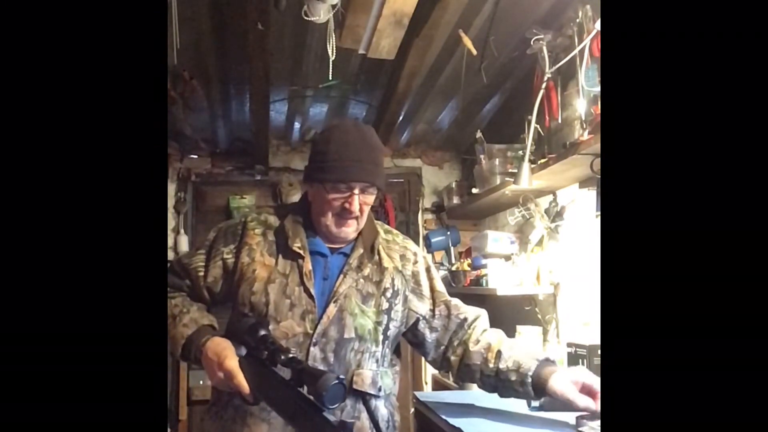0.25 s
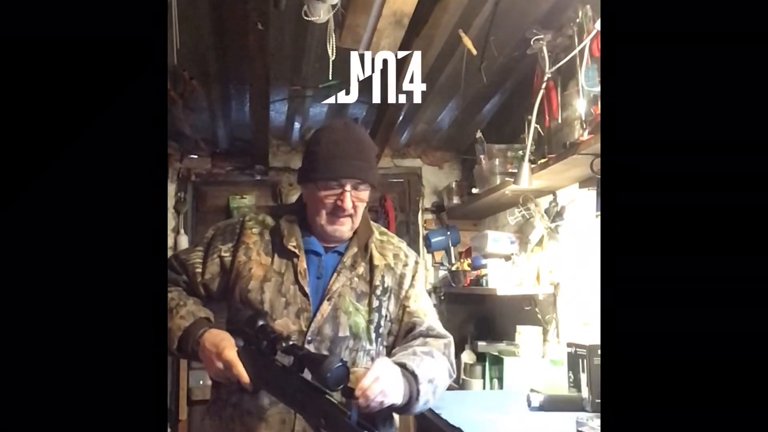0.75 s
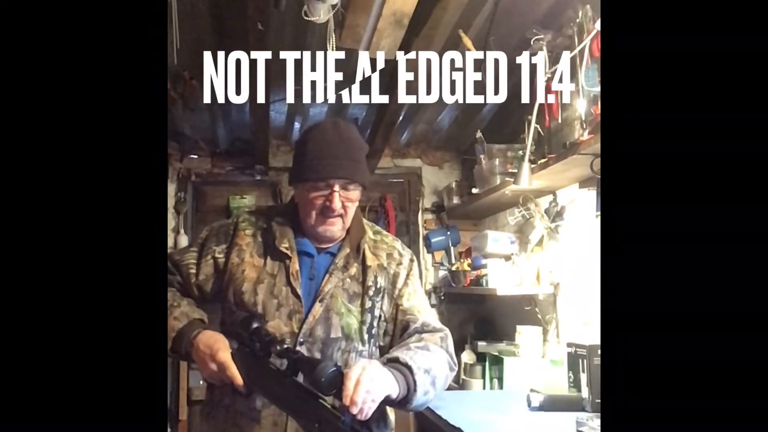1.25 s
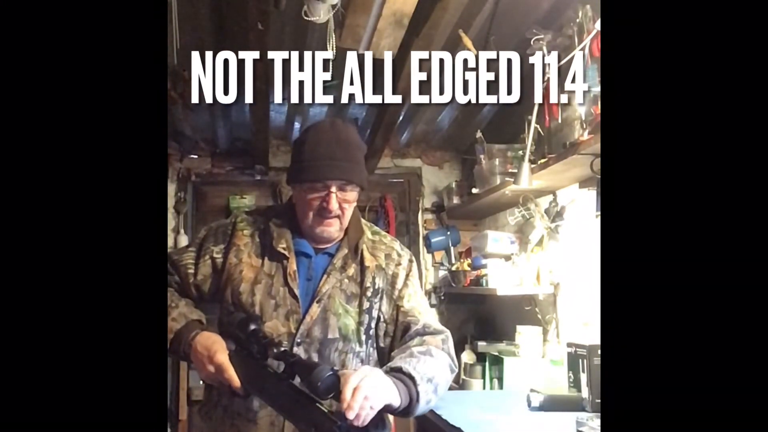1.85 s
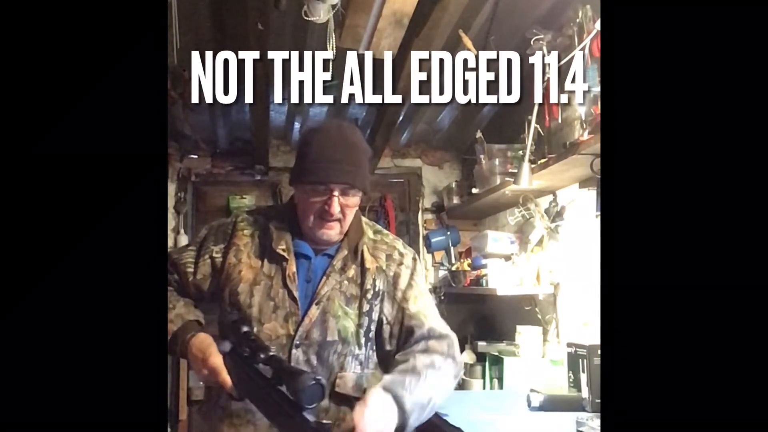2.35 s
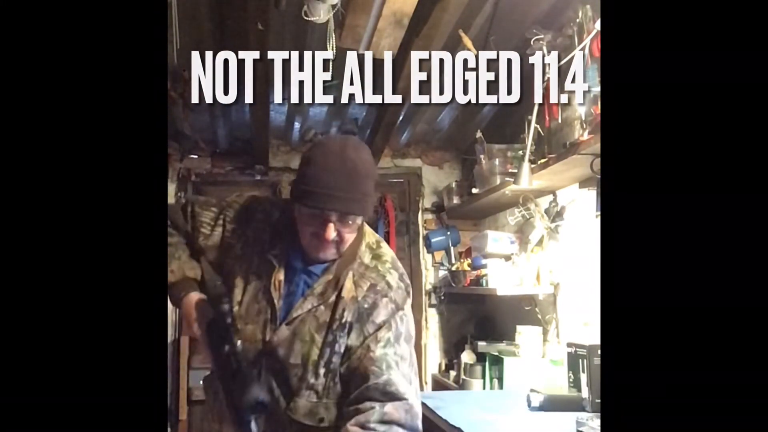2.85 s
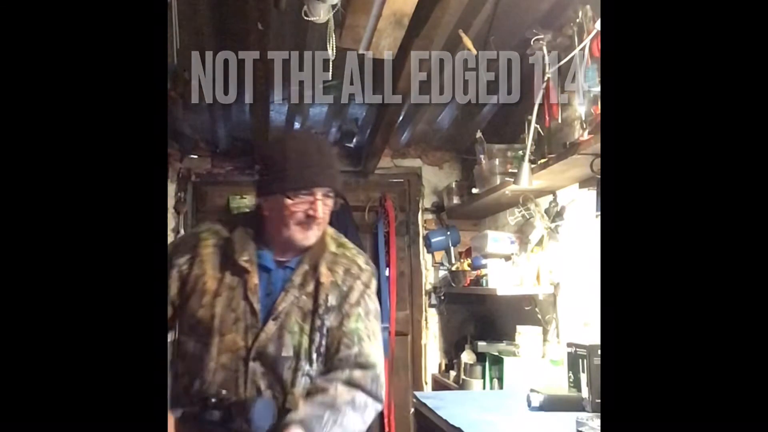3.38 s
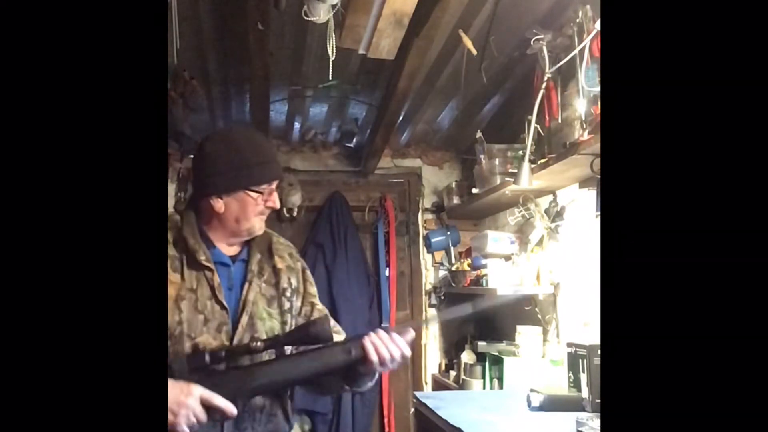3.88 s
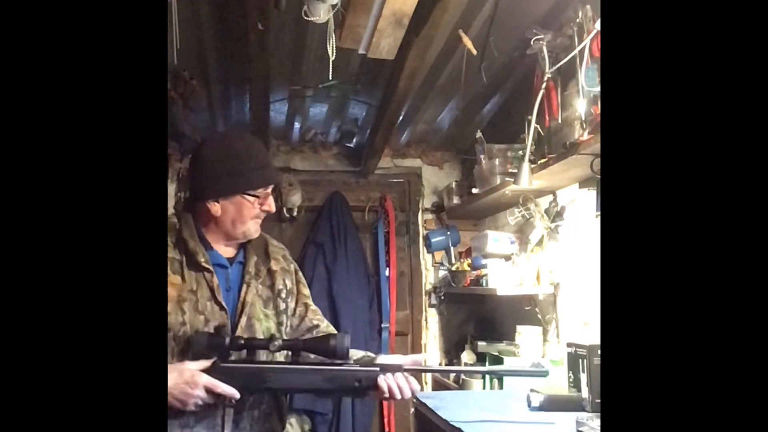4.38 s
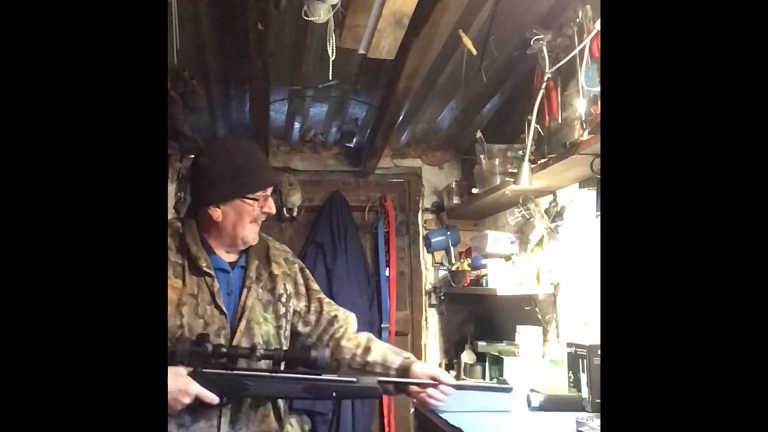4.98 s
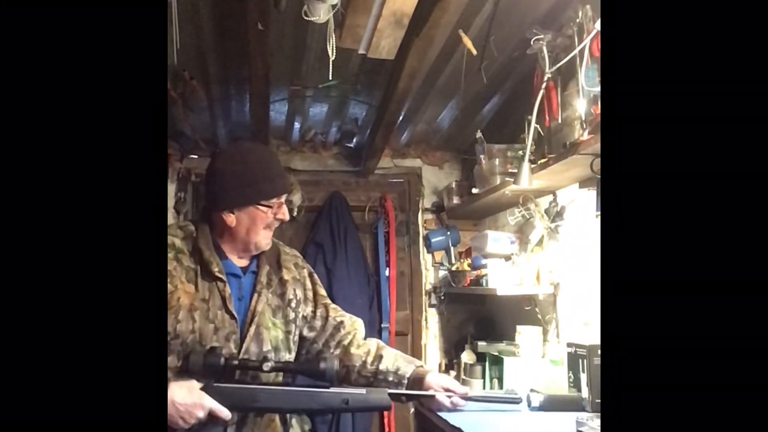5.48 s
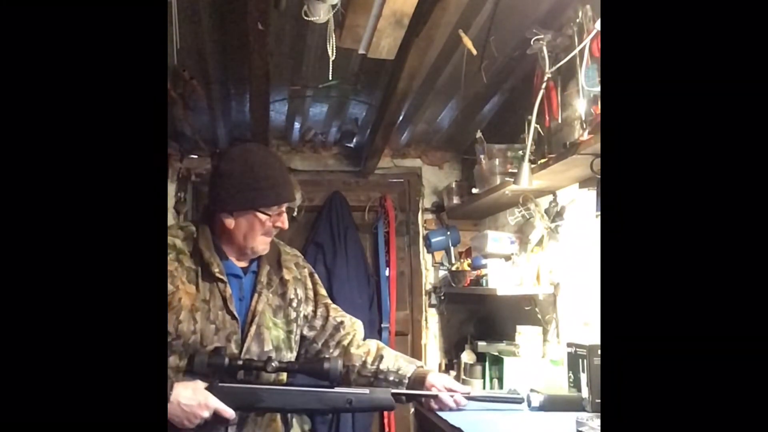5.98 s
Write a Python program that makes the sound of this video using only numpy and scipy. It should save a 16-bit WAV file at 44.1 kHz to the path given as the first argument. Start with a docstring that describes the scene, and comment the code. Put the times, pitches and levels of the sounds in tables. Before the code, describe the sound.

Quiet at first: hiss, distant low rumble, a slight sleeve rustle. Then the latch of an air rifle scrapes free and the steel snaps in a hard, bright cluster of clacks lasting about a tenth of a second. Lighter jingling, a brief sliding scrape and a crisp click come after, fading into tiny handling noises. Close, dry shed acoustics with a short wooden reflection.

```python
"""The steel lock and spring of a break-barrel air rifle clack and rattle, a metre from a phone microphone
in a small wooden shed: bursts of noise excite the steel's modes, and the walls answer. The latch scrapes
free, the barrel slides on its pivot, hands and sleeves rustle on the stock: shaped grainy noise. Behind,
coloured noise is a far rumble that swells unevenly, with wavering sine tones, over the microphone's hiss."""
import sys
import numpy as np
from scipy import signal
from scipy.fft import rfft, irfft, next_fast_len
from scipy.io import wavfile
from scipy.ndimage import uniform_filter1d, map_coordinates

SR = 44100
rng = np.random.default_rng(int(sys.argv[2]) if len(sys.argv) > 2 else 0)


def file_out(sig):
    """Save sig as 16-bit WAV at sys.argv[1]."""
    # one column per channel
    cols = np.atleast_2d(sig).T
    # limit, then scale
    lim = np.clip(cols, -1, 1)
    pcm = np.round(lim * 32767).astype(np.int16)
    wavfile.write(sys.argv[1], SR, pcm)


N = 274958

# outside noise: (time [s], general level [dB], level of its boom [dB])
OUTSIDE = [(0, -64.5, -61.5), (1.2, -65, -60.5), (1.7, -64.5, -59), (2.35, -63, -64.5), (2.67, -61, -54),
           (2.9, -63.5, -56.5), (3.2, -60, -56), (3.45, -63.5, -57), (3.85, -61, -56), (4.3, -61, -57.5),
           (5.05, -59, -56), (5.4, -59, -55), (6.23, -60, -56.5)]


def contacts():
    """Impact excitation: a click and a dying rattle of loose parts ring the steel and knock the stock."""
    # (time [s], rattle t60 [s], low ring [Hz], its level [dB], high ring [Hz], its level [dB],
    #  ring width [share of pitch], treble level [dB], knock level [dB])
    touches = [(.55, 0.1786, 2808, -53, 5300, -54, 0.834, -65, -81),
               (2.5747, .064, 1310, -18.5, 3380, -20, 0.4429, -44, -43),
               (2.588, 0.07956, 2245, -25, 3598, -28, 0.4714, -41, -32),
               (2.621, 0.11874, 1941, -21, 4679, -19.5, .54, -54, -29),
               (2.647, .07, 2050, -28.5, 4670, -24.5, .6, -40, -32.5),
               (2.662, 0.073, 2200, -32, 4433, -32, .44, -55.5, -35.5),
               (3.018, 0.1335, 2113, -37.5, 3908, -43, 0.947, -62, -47.5),
               (3.15, 0.0797, 1803, -54, 4293, -52.5, 0.413, -73, -75.5),
               (3.23, 0.159, 2890, -53, 3103, -48.5, 0.919, -47, -56.5),
               (3.236, 0.1524, 1795, -42, 4988, -39.5, 0.3714, -53.5, -50),
               (3.259, 0.15674, 2184, -38, 3130, -45.5, 0.959, -48.5, -60),
               (3.275, 0.0892, 2220, -54, 3874, -42.5, 1.232, -63.5, -64),
               (3.591, 0.0437, 2838, -50.5, 3204, -62.5, 0.29, -63.5, -60),
               (3.605, 0.0698, 2890, -55, 2998, -55, 0.401, -60.5, -61),
               (3.729, .15, 2672, -53, 6002, -43.5, 0.5026, -56, -55.5),
               (3.787, 0.06486, 2730, -53, 3602, -42, 0.508, -55, -52),
               (4.069, 0.1275, 2086, -55, 3177, -43, 0.8776, -52, -52),
               (4.15, 0.17226, 1495, -40, 5592, -36, 0.881, -38.5, -51),
               (4.178, 0.1105, 1151, -37, 4100, -27, 1.044, -40.5, -51.5),
               (4.184, 0.1008, 2685, -34.5, 3700, -34, 0.584, -46.5, -60),
               (4.198, 0.08946, 2765, -49, 3833, -39, 0.113, -65, -65),
               (4.816, 0.0594, 1501, -61.5, 3600, -57, 0.475, -65.5, -73),
               (4.837, 0.0578, 1703, -46.5, 3400, -49, 1.251, -56.5, -51),
               (4.845, 0.098, 2313, -53.5, 6906, -49, 0.3484, -72, -62),
               (5.264, 0.2394, 2300, -62.5, 4408, -58, 0.38, -74.5, -65),
               (5.536, 0.06565, 1262, -52.5, 2600, -65, 0.3107, -76.5, -56),
               (5.679, 0.092, 1480, -79.5, 6870, -65, 0.322, -73, -77)]
    click_over_ring_db, softer_db_per_s = 18, 130  # the longer the rattle, the softer the first touch
    out, t = np.zeros(N + SR), np.arange(SR // 3) / SR
    head = slice(0, SR // 64)  # the levels hold for this opening part
    for s, t60, low_hz, low_db, high_hz, high_db, spread, treble_db, knock_db in touches:
        fade = amp(-60 * t / t60)
        rattle = grains(len(t), spiky_db=4.5) * fade
        crack = 1 + 1.6204 * amp(-60 * t / 0.02499)  # stronger at the onset
        ringing = filtered(rattle * crack, steel)
        share = np.clip(spread, .05, 3)
        low_ring = filtered(ringing, lambda f: resonance(f, low_hz, share * low_hz) ** 2)
        high_ring = filtered(ringing, lambda f: resonance(f, high_hz, share * high_hz) ** 2)

        # small parts take a moment to start jingling
        fizz = rng.standard_normal(len(t)) * fade * (1 - np.exp(-t / 0.00202))
        treble = filtered(fizz, lambda f: resonance(f, 6198.5, 7765) ** 2)
        knock = filtered(rattle, lambda f: resonance(f, 371.83, 150) ** 2
                         + 0.7101 * resonance(f, 733.98, 493.37) ** 2)
        parts = (low_ring, low_db), (high_ring, high_db), (treble, treble_db), (knock, knock_db)
        blow = sum(amp(level_db) * part / np.std(part[head]) for part, level_db in parts)

        # the bare first touch is a filtered impulse
        click = filtered(t == 0, lambda f: resonance(f, 2290, 3650) ** 2)
        click_db = max(low_db, high_db) + click_over_ring_db - softer_db_per_s * t60
        blow = blow + amp(click_db) * click / click.max()
        out[round(s * SR):][:len(t)] += in_shed(blow, wet_db=-6.5)
    return out[:N]


def steel(f):
    """Modal superposition: the steel's modes, randomly strong at each blow, add to the plain contact."""
    # modes of the steel parts: (frequency [Hz], width [Hz], middle gain over the plain contact [dB])
    modes = [(861.8, 36, -12.5), (1256.4, 117.8, 6), (1725.2, 91.2, 3), (2050, 72.24, 9),
             (2153.1, 44.97, 4), (2650, 270, -0.5), (2890, 39.5, 11), (3380, 168.3, 5.5), (3700, 22, -2),
             (3842.5, 206.8, 6.5), (4100, 120, -0.5), (4696.2, 15, -1.5), (5300, 56.33, 3.5),
             (5536, 140, -9), (6725.6, 77, -0.5), (6716.5, 50, 7.5), (7902, 82, -12.5)]
    strengths = amp(2 * rng.standard_normal(len(modes)))
    response = 1
    for strength, (hz, width, db) in zip(strengths, modes):
        response = response + strength * amp(db) * resonance(f, hz, width)
    return response


def thuds():
    """Rigid-body jolt: the whole rifle excites two damped low modes that start softly."""
    # (time [s], level of the opening 1/64 s [dB])
    jolts = [(2.588, -51.5), (2.621, -37.5), (3.729, -52.5), (3.83, -51.5)]
    out, t = np.zeros(N), np.arange(SR // 3) / SR
    low = np.sin(2 * np.pi * 64 * t)
    upper = 0.6807 * np.sin(2 * np.pi * 135 * t) * amp(-60 * t / .12)  # dies sooner
    thud = (low + upper) * amp(-60 * t / 0.1561) * (1 - np.exp(-t / 0.01337))
    for s, db in jolts:
        out[round(s * SR):][:len(t)] += amp(db) * thud / np.std(thud[:SR // 64])
    return in_shed(out, wet_db=-5.5)


def scrape():
    """Friction of the latch scraping free: narrow squeaky resonances of noise swell and stop."""
    # (start [s], end [s], centre [Hz], width of one of two equal resonances [Hz], level at the peak [dB])
    squeaks = [(2.51, 2.566, 1900, 500, -54), (2.517, 2.561, 2650, 384, -46.5),
               (2.536, 2.581, 4209, 500, -48)]
    t, out = np.arange(N) / SR, 0
    for start, end, hz, width, db in squeaks:
        progress = np.clip((t - start) / (end - start), 0, 1)
        swell = np.sqrt(np.sin(np.pi * progress) + 1e-12)
        squeak = unit(filtered(rng.standard_normal(N), lambda f: resonance(f, hz, width) ** 2))
        out = out + amp(db) * swell * squeak
    return out


def rubbing():
    """Stick-slip friction: grainy noise of steel on steel, shaking spring and cloth on stock."""
    # spectra: (frequency [Hz], relative density [dB per Hz])
    slip_spectrum = [(880, -14), (1500, 0), (2520, -4.5), (3920, -5.5), (4550, -8), (6420, -5.5),
                     (9000, -11.5), (11700, -42.5), (19800, -120)]
    sheen_spectrum = [(4710, -30), (8000, -6.5), (9990, -6.5), (13600, -6.5), (15800, -16.5)]
    dull_spectrum = [(400, -21), (750, 6.5), (1400, 0), (1900, -36.5)]
    slips_gain, sheen_gain, dull_gain, centre_hz = strokes()
    hz, t, z = signal.stft(noise(slip_spectrum, spiky_db=4.0), SR, nperseg=256)
    centre = np.interp(t, np.arange(N) / SR, centre_hz)
    distance = np.log((hz[:, None] + 1) / centre)
    focus = 1 + 1.926 * np.exp(-(distance / 0.7504) ** 2)  # the rubbed part favours one band

    # random patches of time and frequency stand out
    patches = uniform_filter1d(rng.standard_normal(z.shape), size=5, axis=0)
    patches = unit(uniform_filter1d(patches, size=4, axis=1))
    slips = signal.istft(z * focus * amp(1.302 * patches), SR, nperseg=256)[1][:N]

    slips = slips_gain * unit(slips)
    sheen = sheen_gain * noise(sheen_spectrum, spiky_db=1.5)
    dull = dull_gain * noise(dull_spectrum)
    flutter = amp(1.1016 * wobble(60) + 1.0308 * wobble(200))
    return in_shed(flutter * (slips + sheen + dull), wet_db=-4)


def strokes():
    """Incoherent addition: powers of rustle and strokes sum to gains and a power-weighted centre pitch."""
    # sliding steel, shaking spring and rubbing cloth: (start [s], end [s], start level [dB], end level [dB],
    #  time to swell 20 dB before [s], time to fade 20 dB after [s], centre [Hz],
    #  sheen over slips [dB], dull part over slips [dB])
    moves = [(0, 0.006, -49, -52.5, .01, 0.0142, 4100, -7, -11),
             (2.551, 2.565, -49, -45, 0.0976, 0.001, 3008, -12, -15),
             (2.578, 2.604, -23.5, -29.5, 0.0032, 0.1082, 3612, -11, -15.5),
             (2.621, 2.651, -25.5, -26.5, 0.0161, 0.0326, 4220, -19, -7),
             (2.985, 3.163, -51.5, -53, 0.0946, 0.0244, 3881, -9, -10.5),
             (3.215, 3.289, -48, -41, 0.0254, 0.0182, 3198, -14.5, -21),
             (3.604, 3.642, -43.5, -52.5, 0.0076, 0.0757, 3609, -14, -12),
             (3.648, 3.719, -55, -55, 0.1535, .02, 4579, -8, -18.5),
             (3.741, 3.854, -37, -43.5, 0.0176, 0.0268, 4477, -14, -12.5),
             (4.035, 4.109, -57.5, -60, 0.0616, 0.1104, 3400, -17, -6),
             (4.2, 4.25, -61, -59.5, 0.0567, 0.1275, 3380, -22.5, -4.5),
             (4.455, 4.513, -59.5, -53.5, 0.1019, 0.0266, 5176, -7.5, -8.5),
             (4.605, 4.66, -56.5, -63, 0.1326, 0.1143, 4900, -3, -10),
             (4.681, 4.869, -69.5, -64.5, 0.1484, 0.0358, 5300, 6.5, -3.5),
             (4.814, 4.874, -60, -60.5, 0.0106, 0.1023, 5300, -3, -4.5),
             (5.059, 5.106, -64.5, -65.5, 0.2681, 0.0584, 4000, -4, -1.5),
             (5.198, 5.229, -63, -64.5, 0.0667, 0.1337, 3500, -10.5, -1)]
    # faint rustle of the jacket: (time [s], middle level [dB])
    jacket = [(0, -71), (.15, -67.5), (.4, -66.5), (.7, -67), (1.2, -71), (2.2, -71), (2.33, -65.5),
              (2.8, -67), (3.38, -68), (3.55, -63), (3.95, -65), (4.3, -69), (5.0, -67.5), (5.7, -69),
              (6.23, -73)]
    t = np.arange(N) / SR
    jacket_db = curves(jacket)[0] + 2.378 * wobble(16)
    layers = [(jacket_db, 3400, -8, -6)]  # level [dB], centre [Hz], sheen and dull over slips [dB]
    for start, end, start_db, end_db, swell, fade, *colour in moves:
        away = np.maximum(start - t, 0) / swell + np.maximum(t - end, 0) / fade
        layers.append((np.interp(t, [start, end], [start_db, end_db]) - 20 * away, *colour))

    slips = sheen = dull = pitch = 0
    for db, hz, sheen_db, dull_db in layers:
        power = amp(2 * db)
        slips = slips + power
        sheen = sheen + power * amp(2 * sheen_db)
        dull = dull + power * amp(2 * dull_db)
        pitch = pitch + power * hz
    return np.sqrt(slips), np.sqrt(sheen), np.sqrt(dull), pitch / slips


def far_rumble():
    """Room resonance: outside noise through the walls gathers in broad peaks of three noise bands."""
    # spectra: (frequency [Hz], relative density [dB per Hz])
    boom_spectrum = [(25, -25), (38, -27.5), (52, 10.5), (85, 6), (119, -0.5), (150, -9.5), (200, -54)]
    drone_spectrum = [(60, -30), (100, -14), (185, -9), (225, -2.5), (265, -11.5), (340, -20.5), (440, -47)]
    murmur_spectrum = [(280, -28), (340, -4.5), (425, 3), (480, -3), (690, -4), (735, -4), (800, -12),
                       (1330, -7.5), (1430, -7), (1530, -7), (1600, -8.5), (2200, -21.5), (3000, -40)]
    boom_db = curves(OUTSIDE)[1] + 2.5 * wobble(6)
    drone_db = follow(-59.5, .9) + 1.142 * wobble(4.9924)
    murmur_db = follow(-64, 1.1192) + 1.5363 * wobble(9.1)
    boom = amp(boom_db) * noise(boom_spectrum)
    drone = amp(drone_db) * noise(drone_spectrum)
    return boom + drone + amp(murmur_db) * noise(murmur_spectrum)


def hum():
    """Frequency modulation: wavering tones, perhaps of a distant machine, and a resonance-blurred whine."""
    # low tone, its second tone, middle tone: (mean pitch [Hz], scale and knot rate of its wavering [Hz])
    pitches = [(57, 1.8), (116, 6), (222, 3.8)]
    # middle level of the low tone: (time [s], level [dB])
    low_level = [(0, -64.5), (1.3, -69.5), (1.75, -61), (2.1, -74.5), (4.1, -68.5), (4.7, -55),
                 (5.4, -56.5), (5.8, -53.5), (6.23, -51)]
    # middle tone: (time [s], level [dB])
    middle_level = [(0, -66.5), (1.41, -74), (1.56, -60), (1.82, -71), (1.89, -54), (2.22, -71), (2.3, -83),
                    (2.4, -64), (2.85, -68.5), (3.14, -53.5), (3.45, -60), (3.6, -69), (4.15, -65.5),
                    (4.34, -55.5), (4.41, -63.5), (4.48, -48.5), (4.65, -64), (5.66, -54), (5.8, -75),
                    (5.95, -59), (6.23, -54)]
    low_db = curves(low_level)[0] + 1.5 * wobble(8)
    second_db = low_db - 7.5 + 3 * wobble(8)
    out = 0
    for db, (hz, width) in zip((low_db, second_db, curves(middle_level)[0]), pitches):
        phase = 2 * np.pi * np.cumsum(hz + width * wobble(width)) / SR
        out = out + amp(db) * np.sqrt(2) * np.sin(phase)
    whine = unit(filtered(rng.standard_normal(N), lambda f: resonance(f, 1475.6, 57.42) ** 2))
    return out + amp(follow(-77, 2.05)) * whine


def follow(quiet_level_db, slope):
    """Level law: dB of a layer that grows in proportion to the outside noise above -64 dB."""
    return quiet_level_db + slope * (curves(OUTSIDE)[0] + 64)


def in_shed(x, wet_db):
    """Reverberation: x plus a late noise tail in which each frequency dies at its own rate."""
    # (frequency [Hz], t60 [s])
    shed_decay = [(100, 0.2552), (1000, 0.07286), (5000, 0.07613), (14000, 0.12854)]
    hz, t, z = signal.stft(rng.standard_normal(SR // 4), SR, nperseg=128)
    decay = amp(-60 * t / along(shed_decay, hz)[:, None])
    tail = signal.istft(z * decay, SR, nperseg=128)[1]
    tail = np.pad(tail / np.linalg.norm(tail), (round(0.0036 * SR), 0))  # the walls answer 3.6 ms later
    return x + amp(wet_db) * signal.fftconvolve(x, tail)[:len(x)]


def resonance(f, hz, width):
    """Damped oscillator: causal response of one mode, 1 at its top."""
    return 1j * f * width / (hz * hz - f * f + 1j * f * width)


def grains(size, spiky_db):
    """Impulsive noise: white noise in which some slips stand out, by a bounded gain."""
    return rng.standard_normal(size) * amp(spiky_db * np.minimum(rng.exponential(size=size), 4))


def noise(spectrum, spiky_db=0):
    """Spectral shaping: coloured noise of rms 1."""
    return unit(filtered(grains(N, spiky_db), lambda hz: amp(along(spectrum, hz))))


def filtered(x, response):
    """Convolution theorem: the spectrum of x times a complex response of frequency."""
    m = next_fast_len(len(x) + 8192)
    return irfft(rfft(x, m) * response(np.fft.rfftfreq(m, 1 / SR)), m)[:len(x)]


def wobble(rate):
    """Slow random modulation: a smooth curve through random knots, rate of them a second."""
    knots = rng.standard_normal(int(N * rate / SR) + 4)
    return map_coordinates(knots, [np.arange(N) * rate / SR])


def curves(rows):
    """Envelope: straight lines in time, one value per sample for each column after the time."""
    s, *cols = np.transpose(rows)
    return [np.interp(np.arange(N) / SR, s, c) for c in cols]


def along(points, hz):
    """Logarithmic frequency axis: (frequency [Hz], value) points read between by log frequency."""
    f, v = np.transpose(points)
    return np.interp(np.log(hz + 1), np.log(f + 1), v)


def amp(db):
    """Decibel law: the amplitude gain of a level in dB."""
    return 10 ** (np.asarray(db) / 20)


def unit(x):
    """Effective value: x scaled to rms 1."""
    return x / np.sqrt(np.mean(x ** 2) + 1e-20)


def scene():
    """Superposition: the pressures of all sources add at the microphone."""
    return (contacts() + thuds() + scrape() + rubbing() + far_rumble() + hum())[None]


def record(dry):
    """Band limitation: sound and microphone hiss lose the deepest bass and all above 15750 Hz."""
    # (frequency [Hz], relative density [dB per Hz])
    hiss_spectrum = [(1000, -28.5), (1700, -1), (1780, -4.5), (2530, 0.5), (5090, -4), (6590, -6),
                     (12600, -14), (15400, -27.5)]
    hiss = amp(-68) * noise(hiss_spectrum)
    return filtered(dry[0] + hiss, lambda hz: (hz < 15750) * (1j * hz / (30 + 1j * hz)) ** 2)[None]


dry = scene()
out = record(dry)
file_out(out)
```